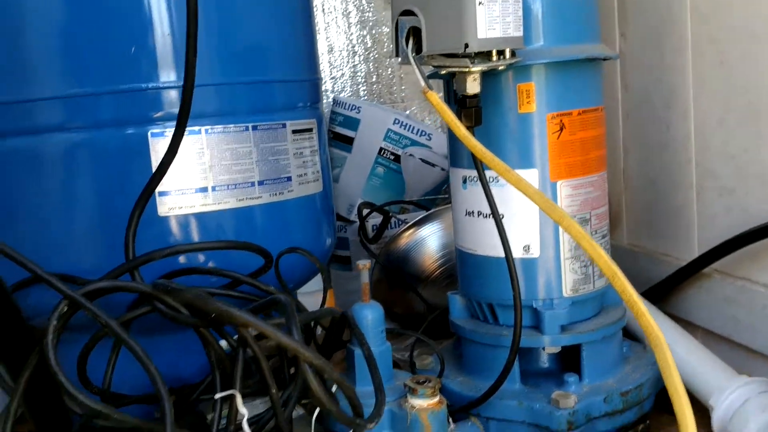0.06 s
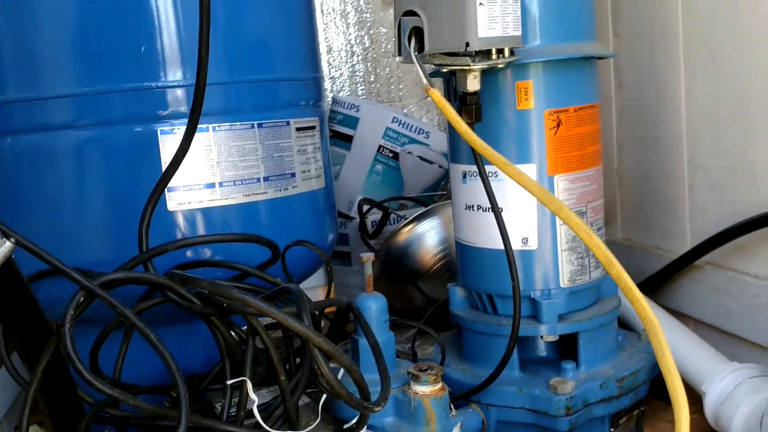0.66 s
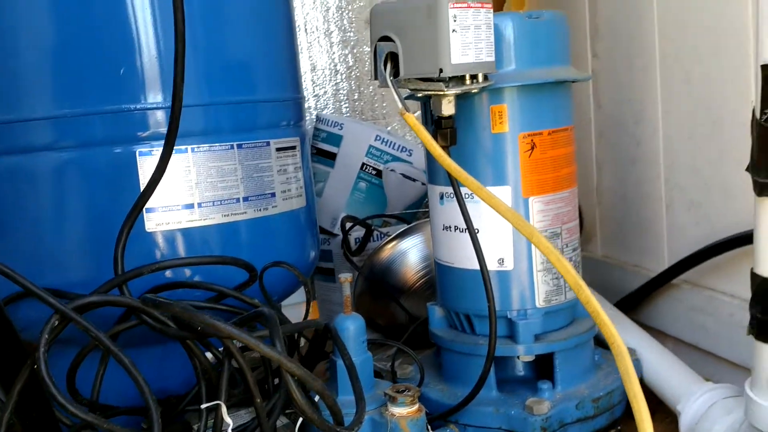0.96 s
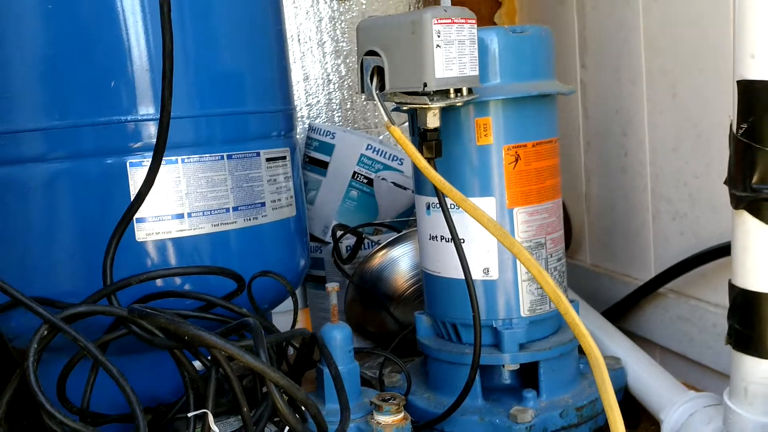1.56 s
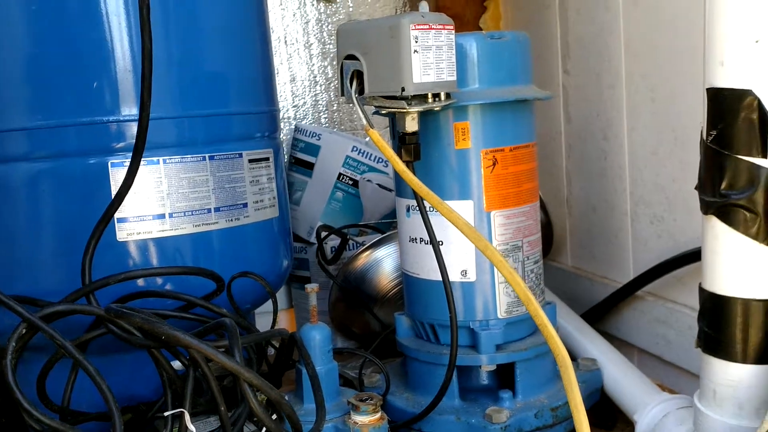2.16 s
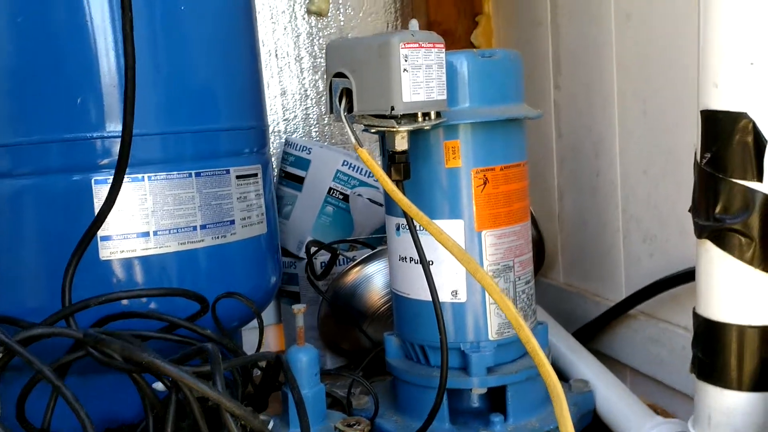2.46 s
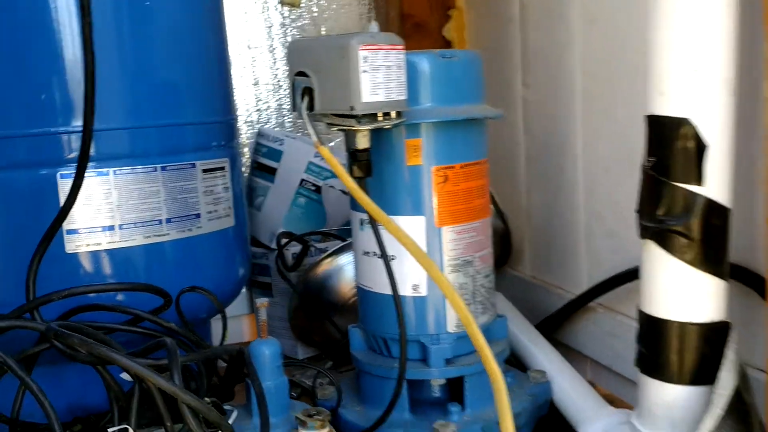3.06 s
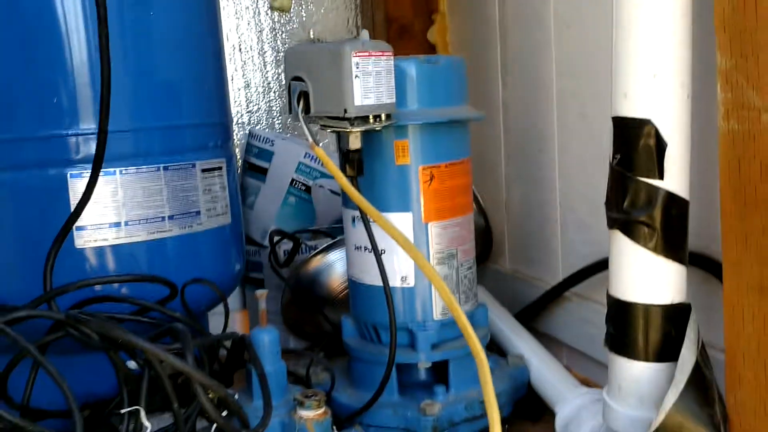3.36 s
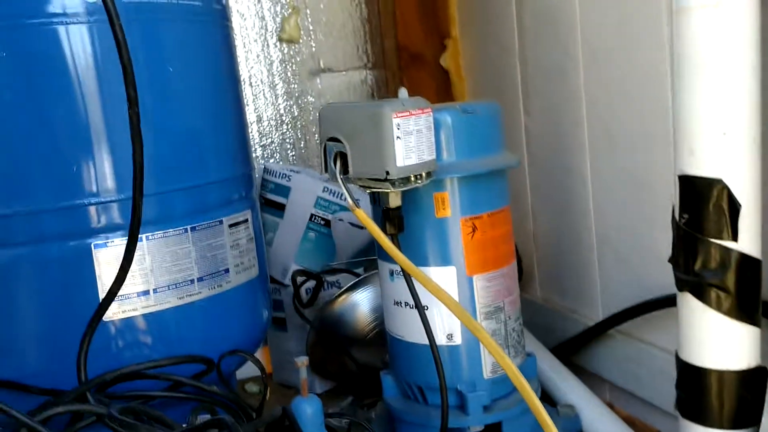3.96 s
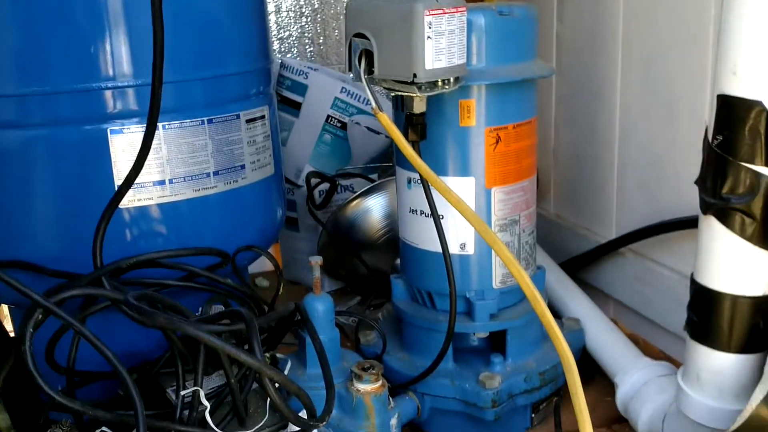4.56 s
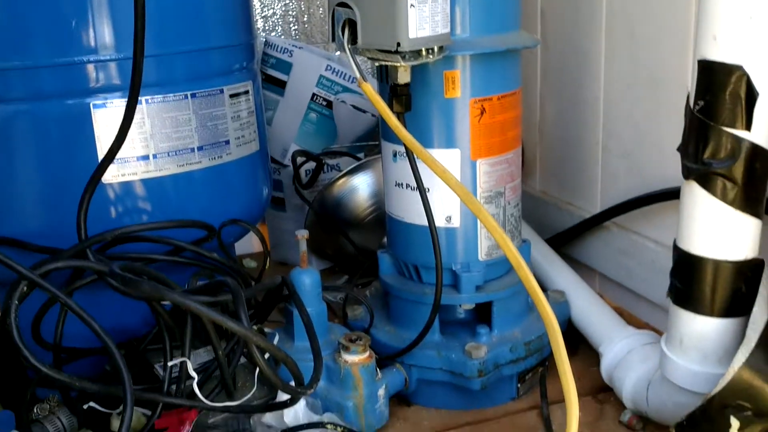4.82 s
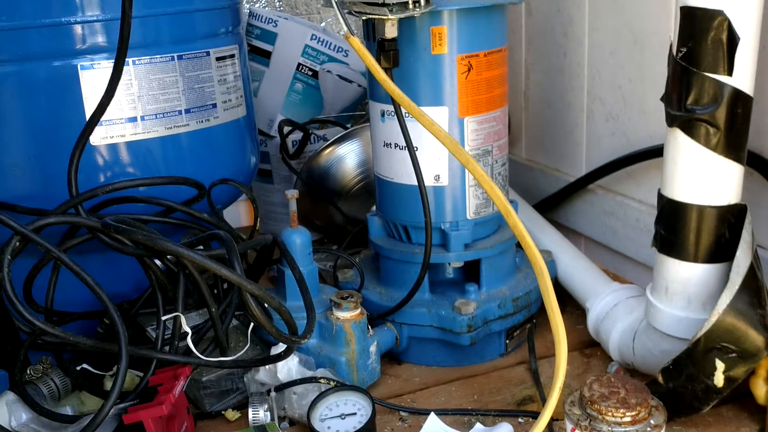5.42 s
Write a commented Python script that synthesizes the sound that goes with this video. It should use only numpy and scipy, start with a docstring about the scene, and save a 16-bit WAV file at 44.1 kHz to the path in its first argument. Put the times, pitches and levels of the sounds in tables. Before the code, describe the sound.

Water hisses steadily from a pump, with drips and plops into a puddle and a brief loud hand rub on the microphone.

```python
"""A small utility closet: water drains from the opened port of a well pump.
The jet hisses, the pipe hums faintly and spray ticks on floor and casing. Heavy drops plop into the puddle
and small drips ring, both by trapping bubbles. The level dips briefly midway. Near the end a hand bumps and
brushes the left port of a two-port microphone with a loud rush and stays there, shading it;
the recorder's gain control ducks under the rush and slowly brings the water back."""
import sys
import numpy as np
from scipy import signal
from scipy.fft import rfft, irfft
from scipy.io import wavfile
from scipy.ndimage import uniform_filter1d

SR = 44100
rng = np.random.default_rng(int(sys.argv[2]) if len(sys.argv) > 2 else 0)


def pcm_store(signal):
    """Save signal as 16-bit PCM."""
    levels = np.round(np.clip(np.atleast_2d(signal), -1, 1) * 32767)
    wavfile.write(sys.argv[1], SR, levels.astype(np.int16).T)


N = 250884
TIME = np.arange(N) / SR
HZ = np.fft.rfftfreq(N, 1 / SR)


def from_db(db):
    """Decibels to gain."""
    return 10 ** (np.asarray(db) / 20)


def unit_rms(x):
    """Scale to rms 1."""
    return x / np.sqrt(np.mean(x ** 2) + 1e-20)


def in_time(rows):
    """Each column of a curve at every sample."""
    times_s, *columns = np.transpose(rows)
    return [np.interp(TIME, times_s, column) for column in columns]


def spectral_gain(rows):
    """Gain at every FFT bin from (frequency [Hz], level [dB]) rows."""
    hz, db = np.transpose(rows)
    return from_db(np.interp(np.log(HZ + 1), np.log(hz), db))


def coloured(noise, spectrum):
    """Give a noise a spectrum, rolled off below 10 Hz; rms 1."""
    gain = spectral_gain(spectrum) * HZ / (HZ + 10)
    return unit_rms(irfft(rfft(noise) * gain, N))


def low_pass(x, hz, order=1):
    """Butterworth low-pass."""
    return signal.sosfilt(signal.butter(order, min(hz, .45 * SR), fs=SR, output="sos"), x)


def delayed(x, delay_s):
    """Fractional delay."""
    return irfft(rfft(x) * np.exp(-2j * np.pi * HZ * delay_s), N)


def drift(rate_hz):
    """Smooth random curve; rms 1."""
    return unit_rms(irfft(rfft(rng.standard_normal(N)) / (1 + (HZ / rate_hz) ** 2), N))


def resonance(phase, width_hz, waver_db, waver_hz):
    """Narrow noise band around a carrier phase, wavering in strength; rms 1."""
    wander = low_pass(rng.standard_normal((2, N)), width_hz / 2, order=2)
    band = wander[0] * np.cos(phase) + wander[1] * np.sin(phase)
    return unit_rms(band * from_db(waver_db * drift(waver_hz)))


def ring(clicks, hz, cycles):
    """Band-pass resonator that decays 60 dB in so many cycles."""
    radius = from_db(-60 * hz / (cycles * SR))
    angle = 2 * np.pi * hz / SR
    return signal.lfilter([1, 0, -1], [1, -2 * radius * np.cos(angle), radius ** 2], clicks + 1e-18)


# Port difference against port sum: (frequency [Hz], side gain [dB])
STEREO_WIDTH = [(120, -8), (430, -4), (900, -1), (2100, 6), (3000, 3), (4500, 0)]
def widened(ports):
    """Set stereo width by frequency; long waves reach both ports more alike."""
    mid = ports.mean(axis=0)
    side = irfft(rfft(ports[0] - mid) * spectral_gain(STEREO_WIDTH), N)
    return np.array([mid + side, mid - side])


# Broad noise of the stream: (frequency [Hz], density [dB])
JET_SPECTRUM = [(30, -9), (60, 1.5), (120, 8), (280, -3.5), (700, -12), (1200, -7), (2000, -19.5),
                (2550, -30.5), (4000, -5), (7000, -2.5), (11000, 3), (14300, 0), (15500, -2.5)]
# Gliding whistles in the hiss, from the jet and the microphone ports:
# (start [Hz], settled [Hz], width [Hz], start level [dB], settled level [dB], left over right [dB])
HISS_WHISTLES = [(5480, 5250, 130, -11, -34, 0), (7000, 6800, 220, -18, -18, 2),
                 (7850, 8100, 170, -24, -17, 2), (8880, 8780, 130, -14, -19, 0),
                 (10250, 9930, 90, -20, -12, -1), (10750, 10230, 150, -19, -14, 6),
                 (11950, 11750, 200, -14, -19, -3), (12520, 12080, 140, -11, -14.5, -4),
                 (13720, 13130, 150, -9, -6, -7), (14250, 13400, 260, -10, -11, -4),
                 (14750, 14200, 200, -13, -9.5, -2)]
def jet(noise_db=-2, tones_db=-.7, flutter_db=1.5, settle_s=3.2, settle_db=-3):
    """Fluttering hiss with gliding whistles; it weakens as the stream settles."""
    settled = np.clip(TIME / settle_s, 0, 1)
    quadrature = np.array([[0], [np.pi / 2]])   # between the ports
    out = from_db(noise_db) * coloured(rng.standard_normal((2, N)), JET_SPECTRUM)
    for start_hz, end_hz, width_hz, start_db, end_db, pan_db in HISS_WHISTLES:
        hz = (start_hz + (end_hz - start_hz) * settled) * (1 + .0016 * drift(6))
        phase = 2 * np.pi * np.cumsum(hz) / SR + quadrature
        tone = resonance(phase, width_hz, waver_db=2, waver_hz=6)
        pan = from_db([[pan_db / 2], [-pan_db / 2]])
        out += tone * pan * from_db(tones_db + start_db + (end_db - start_db) * settled)
    return widened(out) * from_db(flutter_db * drift(80) + settle_db * settled)


# Air column in the pipe: (time [s], pitch [Hz], level [dB])
PIPE_HUM = [(0, 420, -61), (0.8, 420, -63), (1.7, 440, -62), (2.3, 458, -61), (2.75, 462, -60),
            (3.2, 464, -65), (5.69, 464, -68)]
def pipe():
    """Air in the draining pipe hums a faint, wavering note that creeps upwards."""
    hz, db = in_time(PIPE_HUM)
    phase = 2 * np.pi * np.cumsum(hz) / SR
    return from_db(db) * resonance(phase, width_hz=34, waver_db=2.5, waver_hz=6.3)


def droplets(per_s, band_hz, cycles, size_db, clump_db, pitches):
    """Clumped impacts of random size, each ringing at one pitch in the band; rms 1."""
    born = rng.random(N) < per_s * from_db(clump_db * drift(14)) / SR
    sizes = from_db(size_db * np.minimum(rng.exponential(1, N), 3.5))
    clicks = born * sizes * rng.choice([-1, 1], N)
    pitch_index = rng.integers(0, pitches, N)
    ring_hz = np.geomspace(*band_hz, pitches)
    return unit_rms(sum(ring(clicks * (pitch_index == k), hz, cycles) for k, hz in enumerate(ring_hz)))


# How hard the stream splashes: (time [s], level [dB])
SPLASH_LEVEL = [(0, -38), (0.15, -42.5), (0.45, -45.5), (0.8, -35.5), (1.15, -40.5), (1.55, -36.5),
                (1.9, -38.5), (2.03, -41.5), (2.28, -35.5), (2.45, -42), (2.6, -32.5), (2.85, -40),
                (3.3, -42), (3.45, -45.5), (3.65, -37), (3.85, -37.5), (5.1, -38.5), (5.69, -43.5)]
# Coarse splatter as the stream weakens and breaks up: (time [s], level [dB])
SPLATTER_LEVEL = [(0, -88), (2.6, -66), (2.95, -48.5), (3.7, -47), (4.4, -49), (5.69, -49.5)]
def small_drops(jet_db, splash_db):
    """Mist, spray, spatter, tinkle and splatter: the smaller the drop, the higher it rings."""
    mist = droplets(per_s=540, band_hz=(7300, 15000), cycles=36, size_db=6.5, clump_db=4, pitches=18)
    spray = droplets(per_s=220, band_hz=(5900, 8200), cycles=14, size_db=3.5, clump_db=3, pitches=10)
    spatter = droplets(per_s=170, band_hz=(3200, 4200), cycles=11, size_db=3.5, clump_db=3, pitches=6)
    tinkle = droplets(per_s=70, band_hz=(3150, 4300), cycles=24, size_db=4, clump_db=3, pitches=20)
    splatter = droplets(per_s=90, band_hz=(1900, 3000), cycles=12, size_db=4, clump_db=3, pitches=10)
    splatter_db, = in_time(SPLATTER_LEVEL)
    splash = from_db(-14) * spray + from_db(-10.5) * spatter + from_db(-10) * tinkle
    return from_db(jet_db - 8.5) * mist + from_db(splash_db) * splash + from_db(splatter_db) * splatter


def trickle(swing_db, level_db=-53.5, follow=.89):
    """Droplets patter into the puddle, following the swing in splashing."""
    patter = droplets(per_s=90, band_hz=(1050, 2050), cycles=15, size_db=3.5, clump_db=2.5, pitches=18)
    return from_db(level_db + follow * swing_db) * patter


def light_drops(per_s, db, low_hz, high_hz, spread_db=3, follow=.17):
    """Random drops, stronger in harder splashing: rows (time [s], level [dB], pitch [Hz])."""
    wait, size, pitch = rng.random((200, 3)).T
    times_s = np.cumsum(-np.log(1 - wait)) / per_s
    curve_s, splash_db = np.transpose(SPLASH_LEVEL)
    swing_db = np.interp(times_s, curve_s, splash_db - splash_db.mean())
    levels_db = db + follow * swing_db + spread_db * (2 * size - 1)
    rows = np.transpose([times_s, levels_db, low_hz * (high_hz / low_hz) ** pitch])
    return list(rows[times_s < N / SR])


# Heaviest drops in the puddle: (time [s], level [dB], bubble pitch [Hz])
PUDDLE_DROPS = [(0.056, -28.5, 1490), (0.146, -32.5, 1080), (0.611, -28.5, 1210), (0.768, -34, 840),
                (0.925, -37, 1000), (0.969, -32.5, 820), (1.068, -33.5, 765), (1.103, -33, 880),
                (1.222, -30.5, 1020), (1.236, -41, 910), (1.296, -39, 930), (1.347, -29.5, 1120),
                (1.411, -34.5, 830), (1.622, -29, 1390), (1.638, -35, 1170), (1.698, -35, 1480),
                (1.728, -39, 1010), (1.813, -34.5, 955), (1.87, -26, 1530), (2.044, -30.5, 870),
                (2.101, -31.5, 1230), (2.17, -32.5, 1010), (2.243, -32, 1490), (2.4, -37, 860),
                (2.559, -30, 1144), (2.632, -36, 1480), (2.699, -35, 1080), (2.776, -34.5, 1180),
                (2.927, -30.5, 1620), (3.061, -31, 1110), (3.072, -33, 1180), (3.129, -38, 1050),
                (3.352, -31.5, 1300), (3.369, -41, 1250), (3.435, -30.5, 990), (3.485, -32.5, 860),
                (3.577, -30, 1400), (3.6, -35.5, 1290), (3.747, -41, 1660), (3.807, -56, 1110),
                (3.833, -40, 1100), (4.044, -28, 1110), (4.697, -28.5, 930), (4.73, -31.5, 855),
                (4.906, -32.5, 950), (5.051, -31.5, 880), (5.098, -27.5, 970), (5.112, -37, 800),
                (5.181, -33.5, 920), (5.194, -31, 850), (5.274, -29.5, 930), (5.411, -29, 936),
                (5.434, -32.5, 905), (5.519, -30.5, 910), (5.54, -38, 857), (5.593, -35, 977),
                (5.62, -32, 1026), (5.632, -27, 910)]
def plops(drops, bubble_s=.0034, chirp_per_s=9, slap_hz=1400, slap_s=.0005, slap_db=-6,
          gurgle_s=.03, gurgle_db=-12):
    """A drop slaps the puddle and traps a bubble; two weaker, detuned bubbles follow."""
    out, t = np.zeros(N + SR), TIME[:SR // 20]
    slap = np.sin(2 * np.pi * slap_hz * t) * np.exp(-t / slap_s)
    for at_s, db, hz in drops:
        out[int(at_s * SR):][:len(t)] += from_db(db + slap_db) * slap
        for k, (damping, detune, glide, wait) in enumerate(rng.random((3, 4))):
            follower = min(k, 1)   # 0 for the main bubble
            bubble_hz = hz * 2 ** (follower * (detune - .5))
            phase = 2 * np.pi * bubble_hz * t * (1 + chirp_per_s * glide ** 2 * t)
            bubble = np.sin(phase) * np.exp(-t / (bubble_s * 2 ** (damping - .5)))
            start_s = at_s + follower * wait * gurgle_s
            out[int(start_s * SR):][:len(t)] += from_db(db + follower * gurgle_db) * bubble
    return out[:N]


# Sharpest drops on hard surfaces: (time [s], level [dB], centre pitch [Hz])
HARD_DROPS = [(0.095, -31, 5300), (0.1556, -20, 9700), (0.1994, -18, 4080), (0.241, -26, 3900),
              (0.3272, -24.5, 6300), (0.349, -27, 5400), (0.588, -23, 6700), (0.7177, -21, 5250),
              (0.804, -39, 4200), (0.926, -18, 9000), (1.04, -26, 6900), (1.0833, -16.5, 6970),
              (1.1949, -17.5, 4970), (1.3124, -25, 6000), (1.3749, -20, 4800), (1.6038, -21.5, 5600),
              (1.846, -24, 6040), (1.871, -29, 4230), (1.9225, -28, 6300), (1.9684, -20.5, 5200),
              (2.159, -16, 9100), (2.269, -21, 6260), (2.5187, -23.5, 4060), (2.5785, -23, 3870),
              (2.592, -24, 4770), (2.6808, -19.5, 6900), (2.786, -20, 7800), (2.795, -19.5, 8000),
              (2.8529, -20, 7150), (2.912, -24, 7000), (2.9502, -19.5, 2580), (3.1605, -26, 6760),
              (3.244, -30, 7600), (3.27, -22, 2700), (3.283, -26.5, 5230), (3.4521, -61, 7470),
              (3.4805, -24, 7800), (3.625, -24, 4200), (3.652, -20, 3160), (3.748, -17.5, 2550),
              (5.071, -30.5, 5450), (5.393, -37, 6780), (5.417, -21.5, 5200), (5.48, -32, 5660),
              (5.606, -44, 6900)]
def ticks(drops, ring_s=.0009, splash_s=.002, splash_db=-6, spread_octaves=1.1, modes=4):
    """A hard impact rings briefly at pitches set by where it lands, and bursts into a tiny splash."""
    out, t = np.zeros(N + SR), TIME[:SR // 50]
    for at_s, db, hz in drops:
        octaves = spread_octaves * (np.arange(modes) + rng.random(modes) - modes / 2) / modes
        modes_hz = hz * 2 ** octaves
        impact = sum(np.sin(2 * np.pi * mode_hz * t) * (-1) ** k for k, mode_hz in enumerate(modes_hz))
        splash = unit_rms(ring(rng.standard_normal(len(t)), hz, cycles=5)) * np.exp(-t / splash_s)
        tick = impact * np.exp(-t / ring_s) + from_db(splash_db) * splash
        out[int(at_s * SR):][:len(t)] += from_db(db) * tick
    return out[:N]


# Clear drips in shallow water: (time [s], level [dB], bubble pitch [Hz])
SHALLOW_DRIPS = [(0.9083, -30, 5530), (1.5399, -23, 3440), (1.9535, -22, 3570), (2.1899, -23, 3250),
                 (2.2258, -21.5, 3430), (2.29, -21.5, 3160), (2.7003, -24.5, 3150), (2.952, -13, 2800),
                 (3.5478, -19, 7600), (3.625, -25.5, 3300), (3.6521, -27.5, 3820), (3.678, -22, 2800),
                 (3.756, -23.5, 3320), (4.061, -15, 3000), (5.1611, -20.5, 3750)]
def drips(drops, bubble_s=.0016, chirp_per_s=7):
    """A small drip traps a tiny bubble: one short, high, rising note."""
    out, t = np.zeros(N + SR), TIME[:SR // 40]
    for at_s, db, hz in drops:
        phase = 2 * np.pi * hz * t * (1 + chirp_per_s * t)
        out[int(at_s * SR):][:len(t)] += from_db(db) * np.sin(phase) * np.exp(-t / bubble_s)
    return out[:N]


def closet(x, t60_s, build_s, wet_db=-7, left_lag_s=.00018):
    """Direct sound, right port first, plus dense reflections from tank and walls."""
    t = TIME[:SR // 3]
    envelope = from_db(-60 * t / t60_s) * (1 - np.exp(-t / build_s))
    echoes = rng.standard_normal((2, len(t))) * envelope
    echoes /= np.sqrt(np.sum(echoes ** 2, axis=1, keepdims=True))
    direct = np.array([delayed(x, left_lag_s), x])
    return direct + from_db(wet_db) * signal.fftconvolve(x[None], echoes, axes=1)[:, :N]


def dip(at_s=2.79, depth_db=-5, fall_s=.051, recover_s=.5):
    """Gain curve: the level drops once and creeps back."""
    return from_db(np.interp(TIME - at_s, [0, fall_s, fall_s + recover_s], [0, depth_db, 0]))


# Hand strokes on the left port: (middle [s], length [s], level [dB], low-pass [Hz])
HAND_STROKES = [(3.748, 0.043, -52, 50), (3.963, 0.074, -41, 3020), (4.019, 0.029, -24, 11200),
                (4.135, 0.063, -17.5, 3700), (4.184, 0.035, -0.5, 5150), (4.203, 0.05, 3.5, 666),
                (4.246, 0.024, -8, 258), (4.28, 0.073, -10, 586), (4.565, 0.02, -15.5, 182),
                (4.605, 0.057, -24, 352), (4.888, 0.049, -35.5, 225)]
# Skin friction with the port's resonances: (frequency [Hz], density [dB])
SKIN_SPECTRUM = [(30, -5), (70, 3), (150, 5), (240, 2.5), (320, 0), (600, -1), (950, -3.5), (1300, -3),
                 (2500, -5.5), (7000, -6.5), (9200, -5.5), (10000, -5.5), (11200, -6), (12600, -14),
                 (13200, 3), (14000, -6), (15500, -7)]
def hand_rub(grip_db=2, steepness=5.3):
    """Skin sticks and slips over the port; some strokes scrape brightly, others rumble."""
    stick_slip = rng.standard_normal(N) * from_db(grip_db * drift(120))
    friction = coloured(stick_slip, SKIN_SPECTRUM)
    out = np.zeros(N)
    for middle_s, length_s, db, dull_hz in HAND_STROKES:
        touch = 1 / (1 + np.abs(2 * (TIME - middle_s) / length_s) ** steepness)
        out += from_db(db) * touch * unit_rms(low_pass(friction, dull_hz))
    return out


# Hand bumps on the recorder's case: (time [s], level [dB], thud pitch [Hz])
CASE_BUMPS = [(4.007, -19, 650), (4.117, -13, 480), (4.141, -10, 600), (4.202, -1, 560), (4.245, -12, 240),
              (4.555, -19, 330), (4.877, -33, 400)]
def knocks(decay_cycles=1.2, low_cut_hz=150):
    """Each bump makes the case thud briefly; it is too small for deep bass."""
    out, t = np.zeros(N + SR), TIME[:SR // 20]
    for at_s, db, hz in CASE_BUMPS:
        thud = np.sin(2 * np.pi * hz * t) * np.exp(-t * hz / decay_cycles)
        out[int(at_s * SR):][:len(t)] += from_db(db) * thud
    return out[:N] - low_pass(out[:N], low_cut_hz)


# Treble at the left port: (time [s], gain [dB])
LEFT_TREBLE = [(0, -1.5), (2.6, -1), (3.25, 0.5), (3.87, -0.5), (4.02, 11), (4.2, 8.5), (4.35, -9),
               (5.69, -28)]
def hand_shade(ports, above_hz=5400):
    """The hand cups the left port, lifting its treble, then covers it; bass bends round."""
    treble_db, = in_time(LEFT_TREBLE)
    treble = irfft(rfft(ports[0]) / (1 + (above_hz / (HZ + 1)) ** 6), N)
    return ports + np.outer([1, 0], treble * (from_db(treble_db) - 1))


def gain_control(x, threshold_db=-19.5, share=.72, window_s=.038, release_db_per_s=10.5):
    """Gain falls at once when the louder channel passes the threshold, then climbs back steadily."""
    power = uniform_filter1d(x ** 2, int(window_s * SR), axis=1).max(axis=0)
    level_db = 10 * np.log10(np.abs(power) + 1e-12)
    duck_db = share * np.maximum(level_db - threshold_db, 0)
    climb_db = release_db_per_s * TIME
    return x * from_db(climb_db - np.maximum.accumulate(duck_db + climb_db))


def scene():
    """Sound pressure at the left and right microphone ports."""
    splash_db, = in_time(SPLASH_LEVEL)
    swing_db = splash_db - splash_db.mean()
    jet_db = -35 + .26 * swing_db + 1.1 * drift(8.1)   # follows the splashing, surges by chance
    stream = from_db(jet_db) * jet() + pipe()
    sharp = small_drops(jet_db, splash_db)
    puddle = trickle(swing_db)
    light_drips = light_drops(per_s=7, db=-37, low_hz=3000, high_hz=7500)
    light_plops = light_drops(per_s=5, db=-43, low_hz=700, high_hz=1800)
    sharp += from_db(-4.5) * ticks(HARD_DROPS)
    sharp += from_db(-2) * drips(SHALLOW_DRIPS + light_drips)
    puddle += from_db(-2.5) * plops(PUDDLE_DROPS + light_plops)
    drops = closet(sharp, t60_s=.06, build_s=.0015) + closet(puddle, t60_s=.11, build_s=.002)
    rush = np.outer([1, 0], hand_rub() + knocks())   # left only
    return dip() * hand_shade(stream + drops) + rush


def record(dry):
    """Each port minus the delayed, dulled other aims sideways; then gain control, soft clip, top cut."""
    port_gap_s, dull_hz, ceiling, cutoff_hz = .000461, 6500, .8, 15800
    other = irfft(rfft(dry[::-1]) / np.sqrt(1 + (HZ / dull_hz) ** 6), N)
    aimed = dry - .97 * delayed(other, port_gap_s)
    rounded = ceiling * np.tanh(gain_control(aimed) / ceiling)
    return irfft(rfft(rounded) / (1 + (HZ / cutoff_hz) ** 300), N)


dry = scene()
out = record(dry)
pcm_store(out)
```